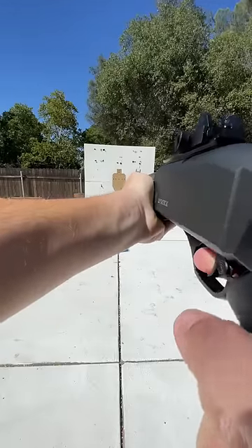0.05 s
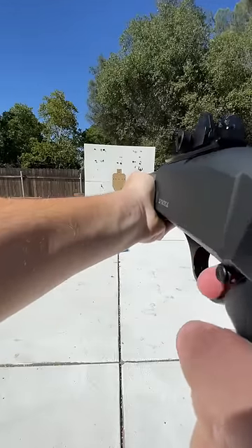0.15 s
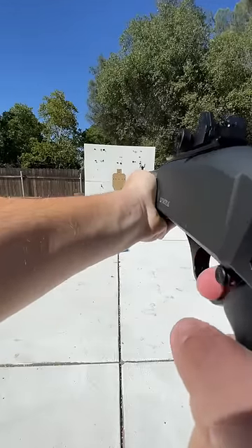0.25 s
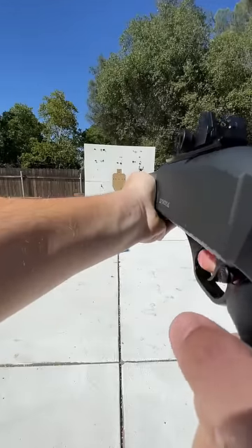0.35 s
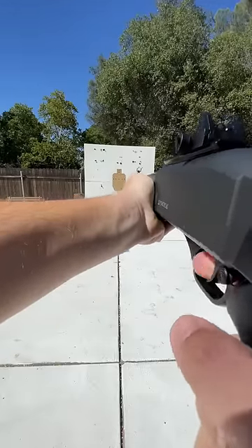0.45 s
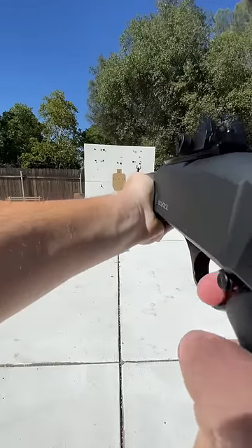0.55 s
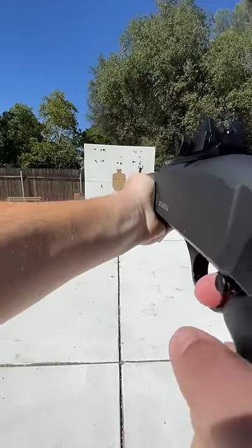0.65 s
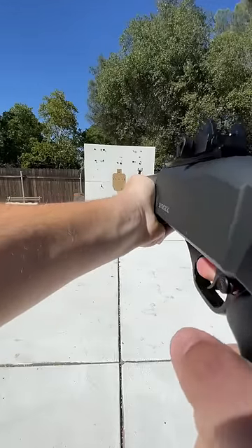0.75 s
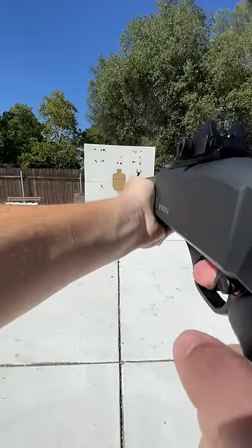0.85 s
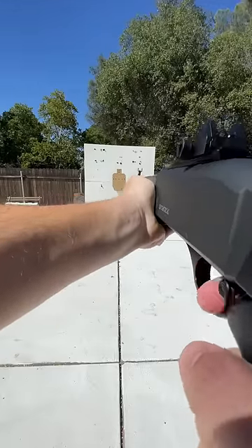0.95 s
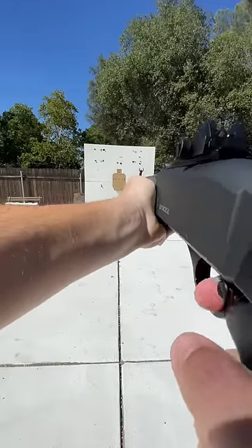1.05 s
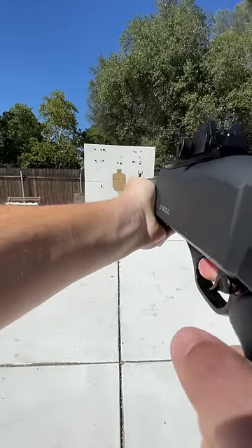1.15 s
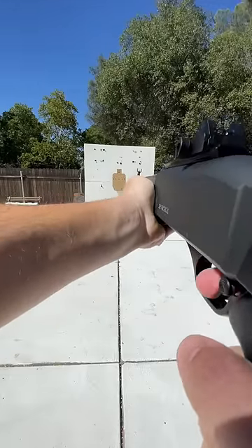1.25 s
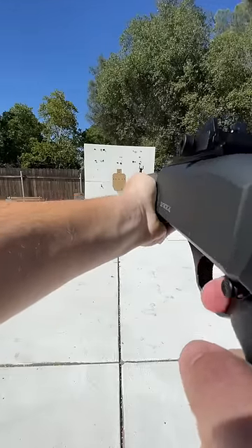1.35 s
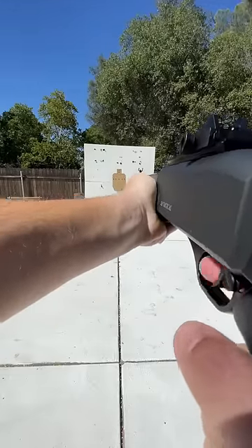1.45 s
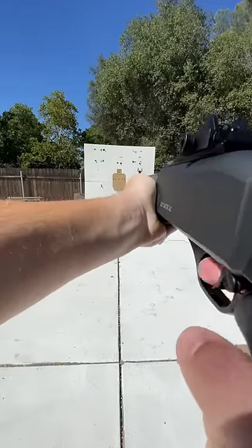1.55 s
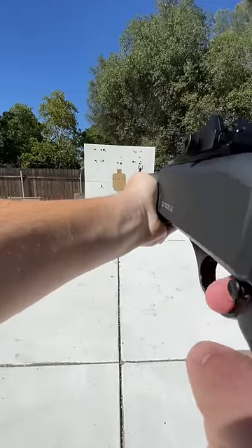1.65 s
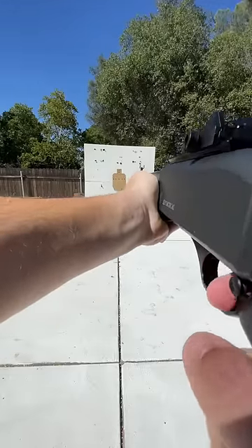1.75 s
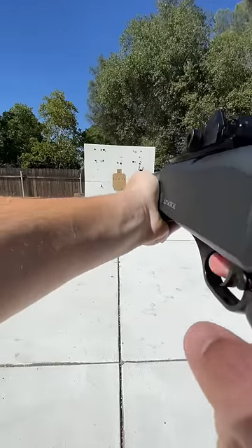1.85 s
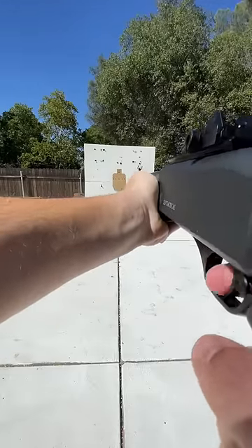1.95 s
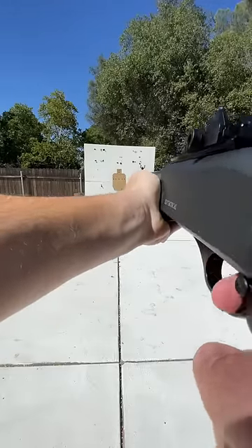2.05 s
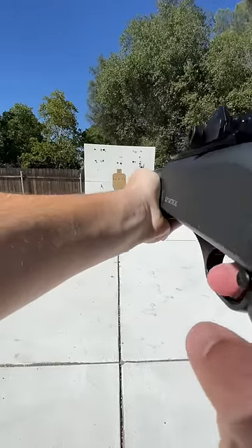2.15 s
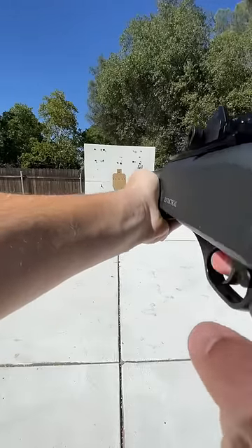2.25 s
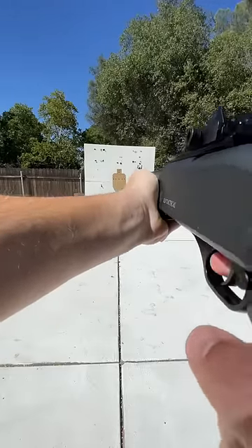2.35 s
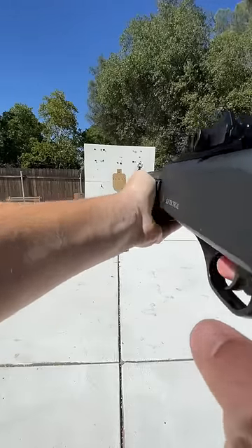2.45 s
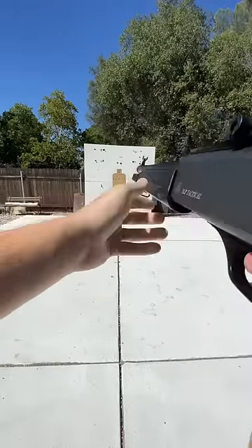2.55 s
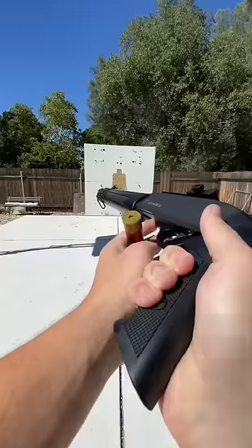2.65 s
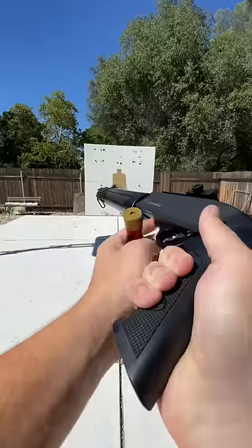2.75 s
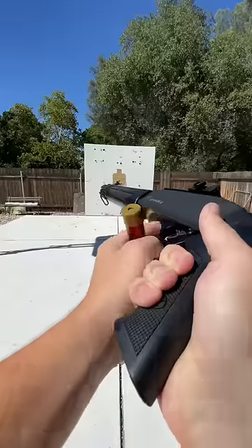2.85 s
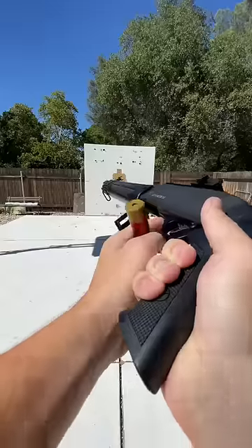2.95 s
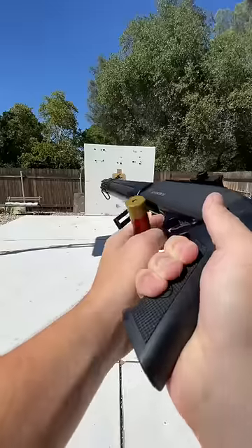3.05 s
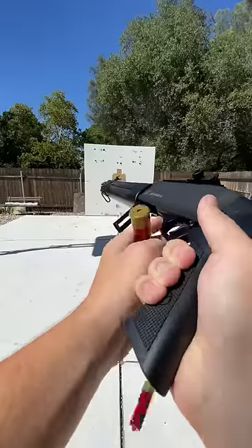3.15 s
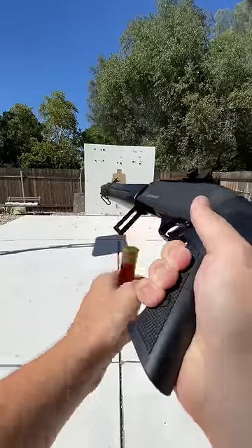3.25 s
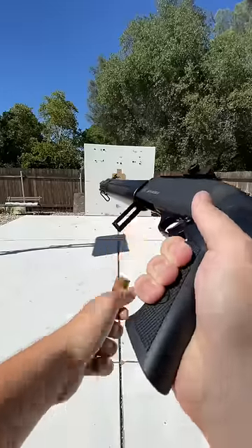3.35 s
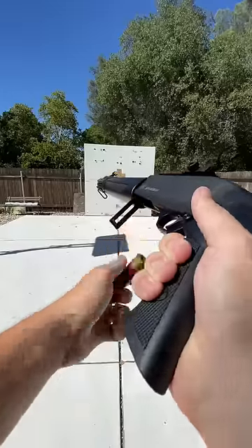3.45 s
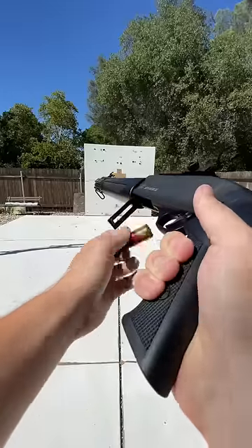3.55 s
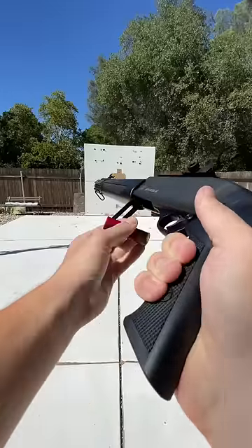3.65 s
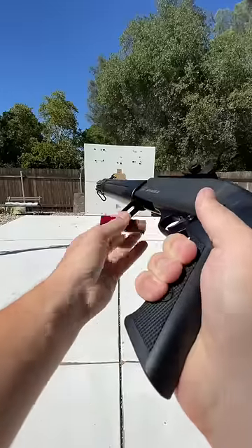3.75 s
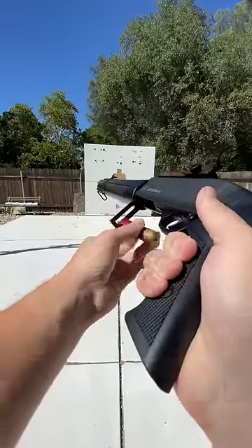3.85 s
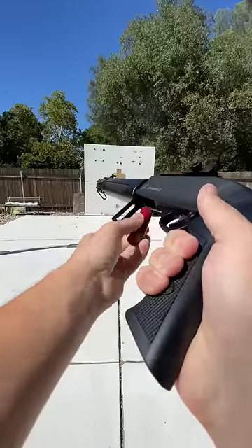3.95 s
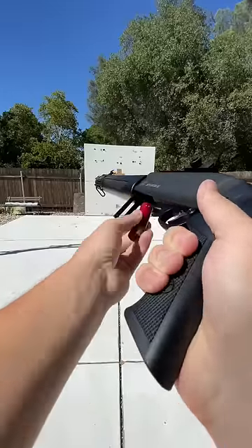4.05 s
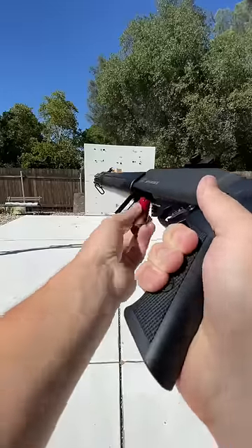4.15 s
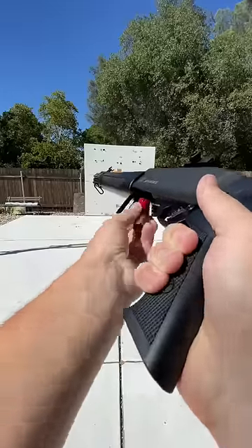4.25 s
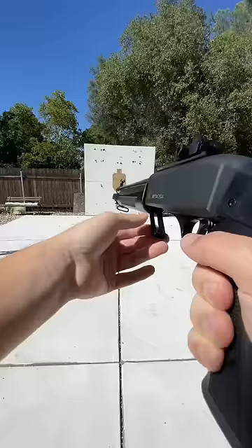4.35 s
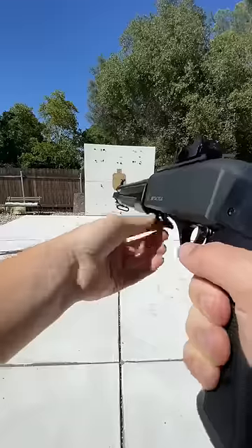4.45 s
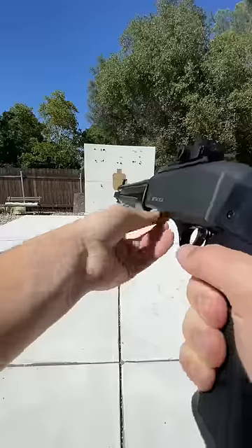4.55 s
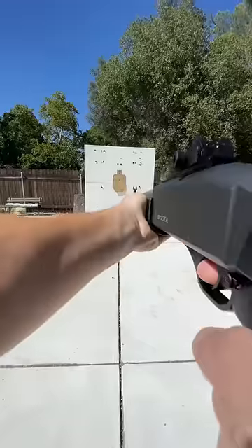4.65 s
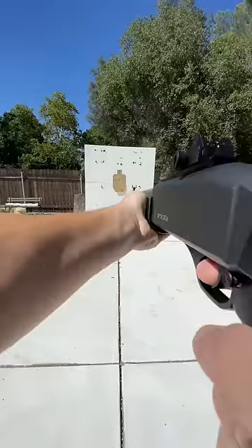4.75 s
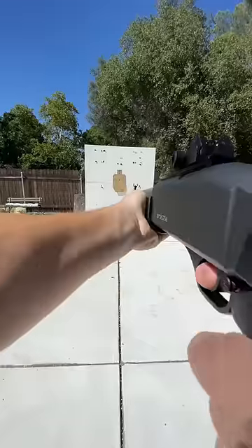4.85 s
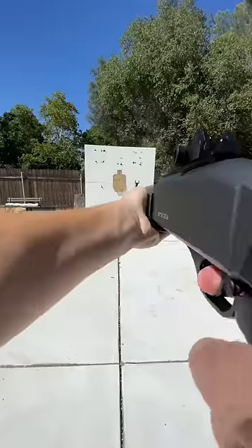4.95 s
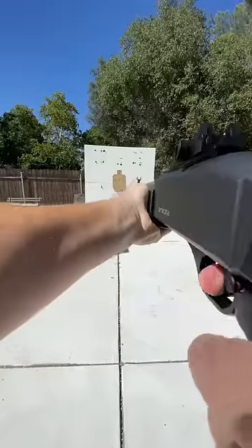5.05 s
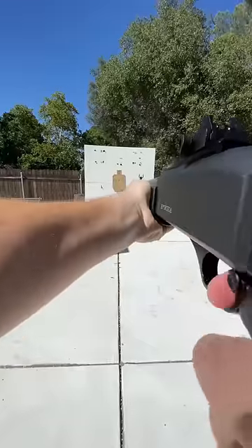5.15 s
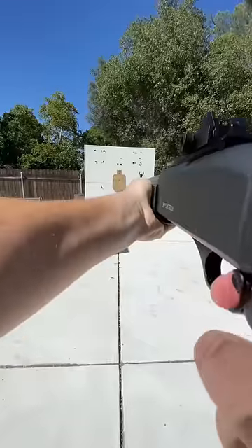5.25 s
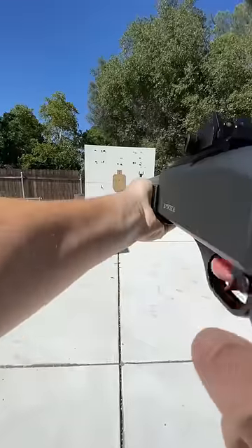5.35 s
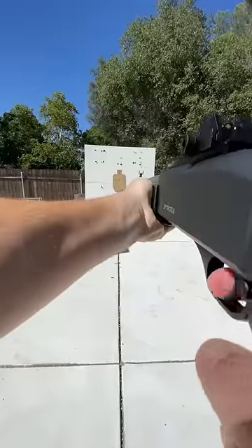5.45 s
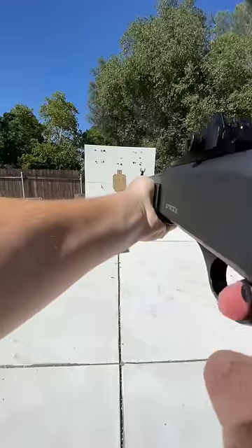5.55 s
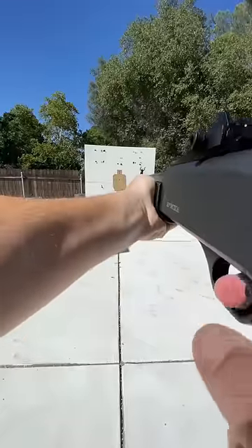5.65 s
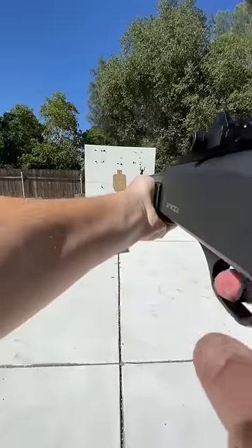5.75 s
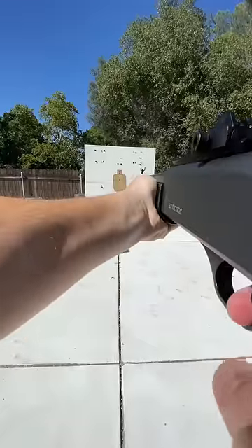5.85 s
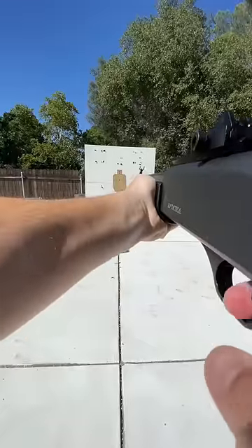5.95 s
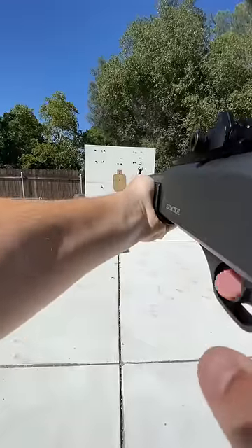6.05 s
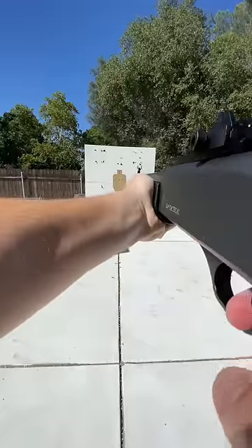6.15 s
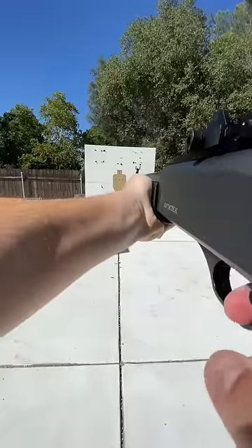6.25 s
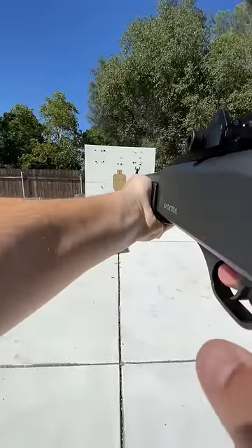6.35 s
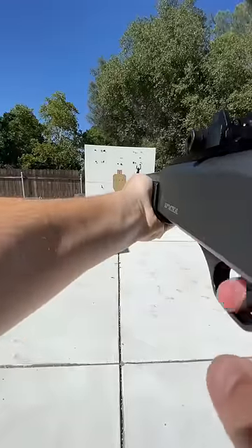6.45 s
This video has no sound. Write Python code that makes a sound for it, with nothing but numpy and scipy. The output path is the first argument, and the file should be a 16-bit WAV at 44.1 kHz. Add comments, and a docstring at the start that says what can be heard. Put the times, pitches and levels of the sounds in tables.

```python
"""Sharp pops of a gas airsoft shotgun, close by in a paved yard: six shots, a clicking reload, five more.
Each shot is a scraping trigger pull, the hammer, a pop and rush of gas, then a hard mechanical clack.
The trigger rasps back while pellets knock on a wooden target board and the fence.
The yard echoes; light wind and a far hum lie underneath."""
import sys
import numpy as np
from scipy import signal
from scipy.fft import rfft, irfft, next_fast_len
from scipy.io import wavfile
from scipy.ndimage import uniform_filter1d

SR = 44100
rng = np.random.default_rng(int(sys.argv[2]) if len(sys.argv) > 2 else 0)


def wav_out(sig):
    """Save sig, one row per channel (or a flat mono array), as 16-bit PCM at SR to the path in sys.argv[1]."""
    wavfile.write(sys.argv[1], SR, np.round(np.clip(np.atleast_2d(sig).T, -1, 1) * 32767).astype(np.int16))


N = 286650
TIME_S = np.arange(N) / SR

# trigger strokes; flow scales the blows after the pop and is low on an empty shell:
# pop_s, crack_db, pulse_db, flow_db, catch_lead_s, catch_db, scrape_db, reset_delay_s
SHOTS = [(0.17, -11.5, -4.5, -0.5, .054, -18.5, -30, .157), (0.5689, -10, -5, -3, .054, -19, -28, 0.16),
         (0.9491, -9, -8.5, -6.5, .047, -20.5, -30.5, 0.16), (1.32, -11, -6, -3.5, .041, -20, -26, .1538),
         (1.662, -11, -8, -3.5, .053, -22, -29.5, 0.16), (2.0239, -11, -2.5, -15, .037, -18, -40, 0.17),
         (5.1388, -8.5, -3.5, -2.5, .047, -11.5, -23.5, .161),
         (5.5051, -9, -4, -2.5, 0.065, -20, -23.5, .152), (5.8168, -9.5, -6, -1.5, .0535, -9, -29, .1495),
         (6.1365, -8, -5, -2.5, .059, -18, -29, 0.16), (6.4839, -10, -7.5, -7.5, .040, -21.5, -32, 0.13)]
# hammer and gas pop: after_pop_s, level_db, rise_s, decay_s, knock_db
RELEASE_BLOWS = [(-.0115, 2, .0011, 0.0013, -14.5), (0, 0.5, 0.0016, 0.0037, -16)]
# gas rush, hard clack, faint settling rattles: after_pop_s, level_db, rise_s, decay_s, knock_db
AFTER_POP_BLOWS = [(.0075, -1, 0.0014, .004, -5.5), (.0258, 1.5, 0.0011, 0.0018, -4.5),
                   (.0318, -12.5, .0006, .0014, -23), (.0493, -18, .0007, .0015, -6),
                   (.064, -14.5, .0007, .0013, -9.5)]
# shot crack: freq_hz, level_db
CRACK_SPECTRUM = [(100, -13), (500, -2.5), (1000, -16.5), (1600, -7.5), (2400, 1), (4000, -4), (6300, -3),
                  (8500, -4), (10700, -0.5), (13000, -17.5), (16000, -44)]
# receiver: freq_hz, level_db, t60_s
RECEIVER_MODES = [(385.5, -38, 0.01), (709, 8.5, 0.042), (810, 4, 0.044), (1195, 2, 0.033)]
# barrel and spring: freq_hz, level_db, t60_s
METAL_MODES = [(1842, -17.5, 0.25), (2370, -4.5, 0.021), (2550, -5, 0.058), (2970, 0, 0.017),
               (3277, -3.5, 0.03), (5540, -1.5, 0.015), (6850, -12, 0.017), (11630, -4.5, 0.016),
               (11230, -7.5, 0.017)]

# finger nudging the trigger: time_s, level_db
NUDGES = [(0.4377, -32), (1.9627, -31), (5.027, -18), (5.0479, -12), (5.368, -19.5), (6.4191, -35.5)]
# trigger linkage: freq_hz, level_db
SCRAPE_SPECTRUM = [(100, -22), (450, -15.5), (800, -9.5), (1400, -11), (2800, -2), (4000, -3), (6300, 0),
                   (8500, -3), (11000, -4), (13000, -18), (16000, -45.5)]
# frame at trigger reset: freq_hz, level_db
FRAME_SPECTRUM = [(60, -6.5), (220, -6), (420, -1), (800, -1.5), (1500, -5.5), (3000, -14), (8000, -31.5)]

# pellet clusters on the board: time_s, knock_db, straggler_delay_s, straggler_db
BOARD_HITS = [(0.3017, -20.5, .013, -22), (0.695, -38, 0.011, -30), (1.046, -19.5, .017, -23.5),
              (1.4486, -21.5, .016, -17), (1.7919, -16, 0.014, -26), (5.2659, -22.5, .018, -27),
              (5.6277, -21.5, .0154, -15), (5.9598, -26.5, .012, -23.5), (6.2709, -32, .015, -38)]
# pellets passing through to the fence: time_s, knock_db
FENCE_HITS = [(0.3768, -15.5), (0.7612, -16.5), (1.5229, -16), (1.8565, -19.5), (5.6923, -13.5),
              (6.0513, -8.5), (6.3678, -11)]
# struck plank: pitch_ratio, level_db, t60_s
PLANK_MODES = [(1, 1, .021), (1.55, -9.5, .012), (2.2, -13, .01)]
# wood knock: freq_hz, level_db
WOOD_SPECTRUM = [(300, -30.5), (550, -25.5), (750, -2.5), (1150, -0.5), (1700, -7), (3000, -16),
                 (8000, -48)]
# pellet tick: freq_hz, level_db
TICK_SPECTRUM = [(400, -23), (900, -9.5), (1400, -3), (2900, -7), (4500, -18), (8000, -22), (11200, -22.5),
                 (14000, -45)]

# shell and loading gate: time_s, click_db, ring_hz, ring_db
RELOAD_CLICKS = [(2.3965, -43.5, 1713, -47), (2.5427, -38.5, 2280, -52), (2.8365, -21.5, 3170, -52),
                 (2.849, -26, 2520, -42), (2.8578, -14, 2520, -25), (2.8929, -17.5, 2800, -27),
                 (2.9136, -27, 2880, -36), (3.1553, -58, 2880, -64), (3.4159, -4, 2320, -17),
                 (3.9256, -18, 2606, -27.5), (3.9335, -11, 2680, -28), (4.029, -60, 1700, -46),
                 (4.0972, -36, 6800, -41), (4.1876, -27, 5050, -32.5), (4.2755, -42.5, 3600, -53),
                 (4.3281, -46, 3530, -47), (4.3633, -54, 3490, -55), (4.4938, -34.5, 2890, -36.5)]
# hard click: freq_hz, level_db
CLICK_SPECTRUM = [(300, -23.5), (1000, -56.5), (1600, -9), (2600, -7), (4500, -3), (6500, 3.5), (9000, 5.5),
                  (11000, 2), (13000, -16.5), (16000, -53)]
# part of a click radiated into the yard: freq_hz, level_db
RADIATED_SPECTRUM = [(300, -7), (1700, 1.5), (3000, -2), (4000, -6), (4900, 2), (6200, -6.5),
                     (8400, -6), (12000, -11), (15000, -22)]
# shell and hand on the stock: time_s, level_db
STOCK_KNOCKS = [(2.3952, -46), (2.85, -29), (2.8929, -29.5), (2.912, -29.5), (2.96, -47), (3.417, -44),
                (3.928, -40.5), (4.029, -41.5), (4.4938, -33), (4.9104, -37), (4.947, -50)]
# hollow stock: freq_hz, level_db
STOCK_SPECTRUM = [(100, -30), (200, -20.5), (290, 2), (500, -12), (820, 4), (1200, -10.5), (2000, -8),
                  (5000, -17), (11000, -29), (13500, -52)]
# dull thuds on the stock, the last a hand bump: start_s, level_db, push_s
LOW_THUMPS = [(2.077, -13.5, 0.003), (3.7, -30, .0025)]
# hand sliding over gun and shell: peak_s, level_db, rise_s, decay_s
HAND_RUBS = [(2.47, -65, 0.056, 0.085), (2.58, -63, 0.037, 0.027), (2.87, -44, 0.024, 0.021),
             (3.07, -72, .04, 0.058), (4.221, -62, .02, 0.023), (4.325, -61.5, 0.04, 0.018)]
# rubbed plastic: freq_hz, level_db
PLASTIC_SPECTRUM = [(200, -9), (550, -1.5), (850, 5.5), (1300, -3), (2400, -1), (4000, -9),
                    (7000, -7.5), (11000, -21), (14000, -48)]
# shell entering the magazine: peak_s, level_db, rise_s, decay_s
SHELL_SLIDES = [(4.032, -50, .003, .006), (4.135, -61, .025, 0.027), (4.203, -56, .004, 0.0073),
                (4.311, -51.5, 0.021, 0.0071), (4.345, -49.5, .006, 0.01)]

# near walls: delay_s, level_db
WALL_ECHOES = [(.0215, -31), (.0378, -27)]
# yard reverb: freq_hz, level_db
YARD_SPECTRUM = [(100, -30), (400, -20), (800, 1.5), (2400, 3), (4000, 4.5), (5800, 5.5), (8500, -6.5),
                 (11000, 6), (15000, -12.5)]
# yard decay: freq_hz, t60_s
YARD_DECAY = [(150, 0.9), (800, 0.36), (2500, 0.45), (5500, 0.57), (9000, 0.42), (14000, 0.073)]
# phase between the two microphone ports: freq_hz, left_lead_rad
PORT_PHASE = [(0, 0), (700, -.2), (1600, .1), (2800, 1.6), (3500, .5), (4200, .9), (5200, 5.6), (6000, 6.3),
              (8000, 9), (9200, 8.9), (11900, 12.5), (13700, 12.7), (15200, 15.6)]

# wind strength on the microphone: time_s, level_db
GUSTS = [(2.3, -54), (2.7, -53), (3.08, -44.5), (3.6, -57), (4.1, -46), (4.19, -62), (4.53, -56.5),
         (4.65, -45), (4.8, -58.5)]
# wind rumble: freq_hz, level_db
WIND_SPECTRUM = [(20, -13.5), (45, -6.5), (70, 2), (120, -9.5), (200, -16.5), (400, -44.5), (1000, -67)]
# far noise and hum: time_s, level_db
FAR_LEVEL = [(2.2, -59), (2.55, -65.5), (2.92, -56.5), (3.3, -64), (4.25, -62.5), (4.5, -54.5)]
# far outdoor noise: freq_hz, level_db
AIR_SPECTRUM = [(60, 1), (150, 2.5), (250, -2), (450, -2.5), (800, -10.5), (1300, -24), (2200, -25.5),
                (3000, -33), (6000, -39.5), (11000, -49), (13000, -66.5)]
# far hum: freq_hz, level_db, t60_s
HUM_MODES = [(240, 0, .4), (350, -12, .2), (470, -14, .2)]
# echo dying at the start: freq_hz, level_db
ECHO_SPECTRUM = [(200, -14), (800, 5), (2500, 1), (6000, -8), (12000, -26)]


def shots(crack_db=-1, knock_db=-3, metal_db=-14, rattle_db=-19, rattle_decay_s=.0076,
          pulse_gain_db=14, pulse_delay_s=.001, sway_db=-9):
    """Hammer, gas and clack knock the receiver and ring the metal; one pressure pulse a shot."""
    blows, body = [], np.zeros((2, N))
    sway = amp(sway_db) * np.array([[1], [-1]])  # sideways flex reaches the ports in antiphase
    for pop_s, shot_db, pulse_db, flow_db, *_ in SHOTS:
        for stage, stage_db in ((RELEASE_BLOWS, shot_db), (AFTER_POP_BLOWS, shot_db + flow_db)):
            for delay_s, blow_db, rise_s, decay_s, receiver_db in stage:
                s, db = pop_s + delay_s, stage_db + blow_db
                blows += [(s, db, rise_s, decay_s), (s, db + rattle_db, rise_s, rattle_decay_s)]
                knock = ring(RECEIVER_MODES, detune=.06) + sway * ring(RECEIVER_MODES, detune=.11)
                add(body, s - rise_s, amp(db + receiver_db + knock_db) * knock)
        push_s = .0006 * amp(-flow_db / 3)  # empty barrel: longer, deeper pulse
        add(body, pop_s + pulse_delay_s, amp(pulse_db + pulse_gain_db) * pressure_pulse(push_s))
    crack = colour(bursts(blows) * noise(.75), CRACK_SPECTRUM)
    return amp(crack_db) * crack + amp(metal_db) * resonate(crack, METAL_MODES) + body


def trigger(scrape_lead_s=.0075, scrape_end_s=.015, fade_s=.003, trim_db=-1, chatter_gap_s=.0015,
            chatter_db=-20, chatter_loss_db=1.5, metal_db=-14, frame_db=-32.5):
    """The linkage catches and scrapes, then slides back and snaps home; its spring chatters."""
    sliding, snaps, resets = np.zeros(N), [], []
    for pop_s, _, _, _, lead_s, catch_db, scrape_db, reset_delay_s in SHOTS:
        catch_s, reset_s = pop_s - lead_s, pop_s + reset_delay_s
        t = np.arange(0, max(lead_s + scrape_lead_s - scrape_end_s, .01), 1 / SR)
        pull = np.minimum(np.minimum(t, t[-1] - t) / fade_s, 1)
        add(sliding, catch_s - scrape_lead_s, amp(scrape_db + trim_db) * pull)
        snaps += [(catch_s - .013, -42.5, .001, .008),  # slack taken up
                  (catch_s, catch_db + trim_db, .0009, .0018),
                  (pop_s - .021, -23, .0009, .0018),  # sear slips
                  (reset_s - .003, -29, .009, .011),  # slides back
                  (reset_s, -15, .0011, .002)]  # snaps home
        for k in range(1, 10):
            s = reset_s + chatter_gap_s * (k + .079 * rng.normal())
            db = chatter_db - chatter_loss_db * k + 1.3 * rng.normal()
            snaps.append((s, db, .0003, .0007))
        resets.append((reset_s, frame_db, .007, .012))
    for s, db in NUDGES:
        snaps += [(s, db + trim_db, .0009, .0018), (s, db - 15, .0035, .011)]  # catch, slide
    friction = sliding * grit(grain_samples=70)
    scrape = colour((friction + bursts(snaps)) * noise(.62), SCRAPE_SPECTRUM)
    frame = colour(bursts(resets) * noise(.27), FRAME_SPECTRUM)
    return scrape + amp(metal_db) * resonate(scrape, METAL_MODES) + frame


def pellets(board_hz=796, fence_hz=795, board_tick_db=-20, straggler_tick_db=-21.5, fence_tick_db=-24,
            bounce_s=.0097, bounce_db=-16.5, knock_db=3, wood_db=-5, rise_s=.0019):
    """Pellets tick and knock on wood; a straggler follows on the board, one bounce on the fence."""
    hits = []
    for s, db, delay_s, straggler_db in BOARD_HITS:
        hits.append((s, db, board_hz, board_tick_db))
        hits.append((s + delay_s, straggler_db, board_hz, straggler_tick_db))
    for s, db in FENCE_HITS:
        hits.append((s, db, fence_hz, fence_tick_db))
        hits.append((s + bounce_s, db + bounce_db, fence_hz, fence_tick_db + bounce_db / 2))
    knocks = np.zeros(N)
    attack = 1 - np.exp(-TIME_S[:SR // 4] / rise_s)
    for s, db, hz, _ in hits:
        modes = [(hz * ratio, mode_db, t60_s) for ratio, mode_db, t60_s in PLANK_MODES]
        add(knocks, s - .003, amp(db + knock_db) * ring(modes, detune=.03) * attack)
    wood = bursts([(s - .002, db + wood_db, .0005, .003) for s, db, _, _ in hits]) * noise(.7)
    ticks = bursts([(s - .0015, db, .0005, .0026) for s, _, _, db in hits]) * noise(.6)
    return knocks + colour(wood, WOOD_SPECTRUM) + colour(ticks, TICK_SPECTRUM)


def reloading(clicks, jiggle_db=-27, knock_db=-1, rub_db=-13):
    """Shell and gate click with some loose play; the shell knocks and rubs the hollow stock."""
    snaps = [(s, db, .0006, .0008) for s, db, *_ in clicks]
    jiggles = [(s, db + jiggle_db, .002, .005) for s, db, *_ in clicks]
    knocks = [(s, db + knock_db, .0015, .004) for s, db in STOCK_KNOCKS]
    rubs = [(s, db + rub_db, .008, .012) for s, db in STOCK_KNOCKS]
    clicking = colour(bursts(snaps + jiggles) * noise(.93), CLICK_SPECTRUM)
    return clicking + colour(bursts(knocks + rubs) * noise(.33), STOCK_SPECTRUM)


def shell_pings(clicks):
    """Each shell or gate click briefly rings two modes."""
    out = np.zeros(N)
    for s, _, hz, db in clicks:
        add(out, s - .0007, amp(db) * ring([(hz, 0, .015), (1.37 * hz, -8, .008)]))
    return out


def gate_taps(start_s=2.959, click_db=-32.5, ring_hz=2820, ring_db=-40.5, loss_db=8.5,
              gap_s=.045, gap_ratio=.88, count=5):
    """Click rows: the swinging gate taps its stop, ever sooner and softer."""
    gaps_s = gap_s * gap_ratio ** np.arange(count)
    return [(start_s + gaps_s[:k].sum(), click_db - loss_db * k, ring_hz, ring_db - loss_db * k / 2)
            for k in range(count)]


def shell_ticks(above_rub_db=5, scatter_db=3, ring_hz=3200, ring_db=-5, per_rub=3):
    """Click rows: the shell ticks at random under the sliding hand, louder on firmer rubs."""
    ticks = [(s + rng.uniform(-rise_s, decay_s), db + above_rub_db + scatter_db * rng.normal())
             for s, db, rise_s, decay_s in HAND_RUBS for _ in range(per_rub)]
    return [(s, db, ring_hz, db + ring_db) for s, db in ticks]


def low_thumps(cutoff_hz=600):
    """Dull pressure pulses: thuds on the stock, and a hand bump."""
    out = np.zeros(N)
    for s, db, push_s in LOW_THUMPS:
        add(out, s, amp(db) * pressure_pulse(push_s))
    return signal.sosfilt(signal.butter(2, cutoff_hz, fs=SR, output="sos"), out)


def hand_rubs():
    """Skin sticks and slips on plastic in fine grains."""
    return colour(bursts(HAND_RUBS) * grit(grain_samples=130) * noise(.23), PLASTIC_SPECTRUM)


def magazine_tube(pitch_hz=900, t60_s=.013):
    """The sliding shell excites the hollow tube."""
    return resonate(bursts(SHELL_SLIDES) * noise(.38), [(pitch_hz, 0, t60_s)])


def yard(x, tail_db, build_s=.002, wall_cut_hz=400, t60_scale=1, crossfade_hz=4.3, tails=3):
    """Wall slaps, then a diffuse tail dying band by band; several tails crossfade to keep it smooth."""
    out = np.zeros((2, N))
    slap = signal.sosfilt(signal.butter(2, wall_cut_hz, "highpass", fs=SR, output="sos"), x)
    for s, db in WALL_ECHOES:
        add(out, s, amp(db) * slap)
    attack = 1 - np.exp(-TIME_S[:SR] / build_s)
    for k in range(tails):
        hz, t, bands = signal.stft(rng.standard_normal((2, SR)), SR, nperseg=256)
        t60_s = t60_scale * lookup(YARD_DECAY, hz)[:, None]
        bands *= amp(lookup(YARD_SPECTRUM, hz)[:, None] - 60 * t / t60_s)
        tail = signal.istft(bands, SR, nperseg=256)[1][:, :SR] * attack
        crossfade = np.sqrt(2 / tails) * np.cos(2 * np.pi * crossfade_hz * TIME_S + np.pi * k / tails)
        out += convolve(x * crossfade, amp(tail_db) * tail / np.linalg.norm(tail[0]))
    return out


def wind(flutter_db=3):
    """Gusts buffet the microphone ports with an uneven rumble."""
    flutter = unit_rms(sum(np.sin(2 * np.pi * (hz * TIME_S + rng.random()))
                           for hz in np.geomspace(3, 16, 20)))
    level_db = np.interp(TIME_S, *np.transpose(GUSTS)) + flutter_db * flutter
    return amp(level_db) * colour(noise(.69), WIND_SPECTRUM)


def far_noise(air_db=-2.5, hum_db=-6):
    """Far outdoor noise and a wavering hum swell and sink together."""
    hum = amp(hum_db) * resonate(noise(1), HUM_MODES)
    air = amp(air_db) * colour(noise(.64), AIR_SPECTRUM)
    return amp(np.interp(TIME_S, *np.transpose(FAR_LEVEL))) * (air + hum)


def dying_echo(start_db=-52, fall_db_per_s=57):
    """Diffuse tail of an earlier shot."""
    return amp(start_db - fall_db_per_s * TIME_S) * colour(noise(0), ECHO_SPECTRUM)


def mic_ports(x):
    """Sound from the gun reaches the two ports at different phases."""
    size = next_fast_len(N + SR // 4)
    turn = np.exp(.5j * lookup(PORT_PHASE, np.fft.rfftfreq(size, 1 / SR)))
    return irfft(rfft(x, size) * np.array([turn, turn.conj()]), size)[:, :N]


def pressure_pulse(push_s, rise_s=.00035):
    """Air pushes, then sucks back."""
    t = TIME_S[:SR // 40]
    return (1 - t / push_s) * np.exp(-t / push_s) * (1 - np.exp(-t / rise_s))


def grit(grain_samples, depth_db=4):
    """Grainy friction gain, rms 1."""
    roughness = unit_rms(uniform_filter1d(rng.standard_normal(N), size=grain_samples))
    return unit_rms(amp(depth_db * roughness))


def bursts(rows, lead_s=.09):
    """Power-summed envelope of rows: peak_s, level_db, rise_s, decay_s."""
    power = np.zeros(N)
    t = TIME_S[:SR // 3] - lead_s
    for s, db, rise_s, decay_s in rows:
        add(power, s - lead_s, amp(db) ** 2 * np.exp(-2 * abs(t) / np.where(t < 0, rise_s, decay_s)))
    return np.sqrt(power)


def ring(modes, detune=0):
    """Struck modes, initial rms 1, with optional random detuning."""
    t = TIME_S[:SR // 4]
    sound = sum(amp(db - 60 * t / t60_s) * np.sin(2 * np.pi * hz * (1 + detune * rng.normal()) * t)
                for hz, db, t60_s in modes)
    return sound * np.sqrt(2 / sum(amp(db) ** 2 for _, db, _ in modes))


def resonate(x, modes):
    """Unit-energy modal filter."""
    response = ring(modes)
    return convolve(x, response / np.linalg.norm(response))


def colour(x, spectrum, size=4096):
    """Causal unit-energy filter shaped by a spectrum."""
    log_gain = np.log(amp(lookup(spectrum, abs(np.fft.fftfreq(size, 1 / SR)))))
    response = np.fft.ifft(np.exp(signal.hilbert(log_gain).conj())).real[:size // 2]
    return convolve(x, response / np.linalg.norm(response))


def noise(correlation):
    """Stereo white noise."""
    shared, own = rng.standard_normal(N), rng.standard_normal((2, N))
    return np.sqrt(correlation) * shared + np.sqrt(1 - correlation) * own


def convolve(x, response):
    """Filters each channel."""
    return signal.oaconvolve(np.atleast_2d(x), np.atleast_2d(response), axes=1)[:, :N]


def lookup(table, hz):
    """Interpolates on a log-frequency axis."""
    knots_hz, values = np.transpose(table)
    return np.interp(np.log(hz + 1), np.log(knots_hz + 1), values)


def add(mix, start_s, sound):
    """Mixes in place."""
    part = mix[..., max(round(start_s * SR), 0):][..., :sound.shape[-1]]
    part += sound[..., :part.shape[-1]]


def amp(db):
    """Decibels to gain."""
    return 10 ** (np.asarray(db) / 20)


def unit_rms(x):
    """Scales to rms 1."""
    return x / np.sqrt(np.mean(x ** 2) + 1e-20)


def scene():
    """Gun close and slightly right, target far ahead; gun, clicks and pellets echo in the yard."""
    gun = mic_ports(shots() + trigger()) * amp([[-.5], [.5]])
    click_rows = RELOAD_CLICKS + shell_ticks() + gate_taps()
    clicks = mic_ports(reloading(click_rows))
    target = pellets()
    handling = mic_ports(shell_pings(click_rows)) + hand_rubs() + magazine_tube()
    thumps = mic_ports(low_thumps())
    echoes = yard(colour(clicks, RADIATED_SPECTRUM), tail_db=-26.5, build_s=.0095, t60_scale=.78, tails=2)
    echoes += yard(gun, tail_db=-24) + yard(target, tail_db=-11.5)
    return gun + target + clicks + handling + thumps + echoes + wind() + far_noise() + dying_echo()


def record(dry, low_cut_hz=56, lag_turns=1.45, lag_corner_hz=50, ceiling=.95, high_cut_hz=16200):
    """The microphone thins and delays the bass, so pops fall in pitch; then soft clip and band limit."""
    size = next_fast_len(N + SR // 4)
    hz = np.fft.rfftfreq(size, 1 / SR)
    highpass = (1j * hz / (1j * hz + low_cut_hz)) ** 2
    bass_lag = np.exp(-2j * np.pi * lag_turns * np.log(hz + lag_corner_hz))
    heard = irfft(rfft(dry, size) * highpass * bass_lag, size)[:, :N]
    clipped = heard / (1 + (heard / ceiling) ** 4) ** .25
    lowpass = signal.firwin(511, high_cut_hz, window=("kaiser", 9), fs=SR)
    return signal.oaconvolve(clipped, lowpass[None], "same")


dry = scene()
out = record(dry)
wav_out(out)
```